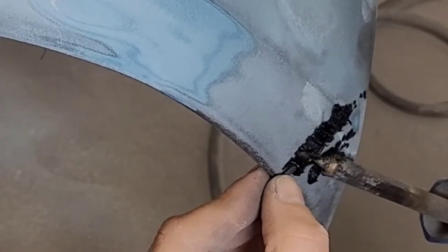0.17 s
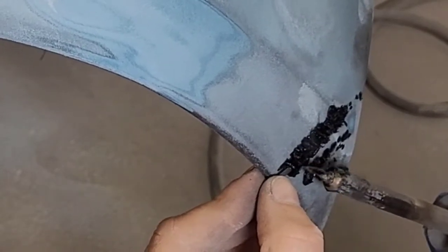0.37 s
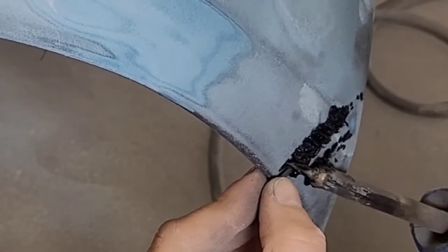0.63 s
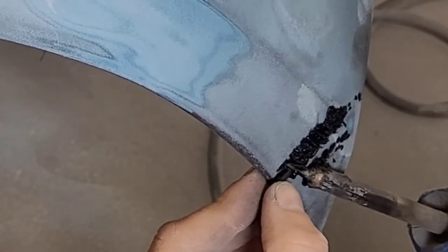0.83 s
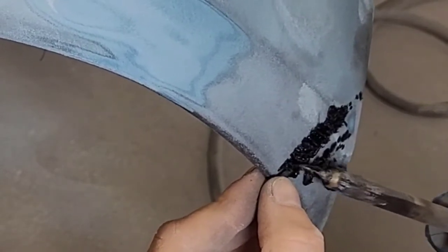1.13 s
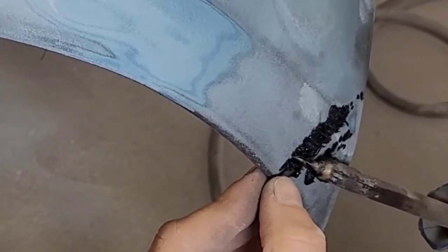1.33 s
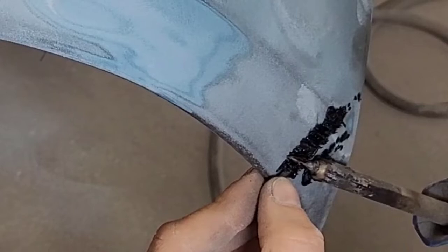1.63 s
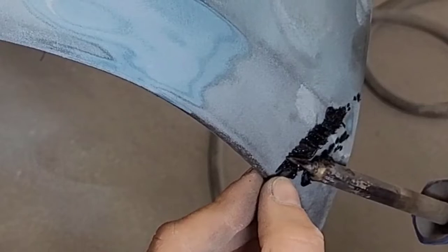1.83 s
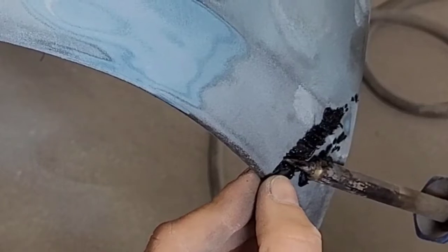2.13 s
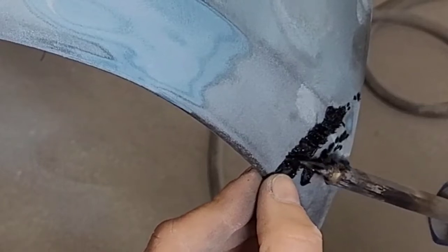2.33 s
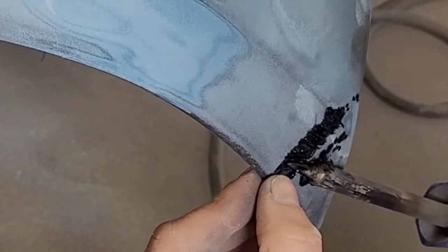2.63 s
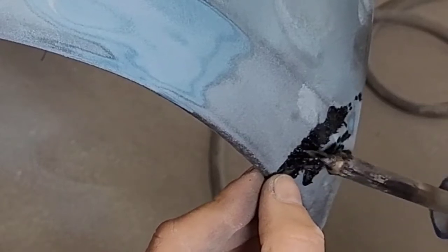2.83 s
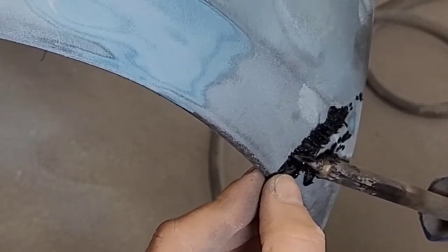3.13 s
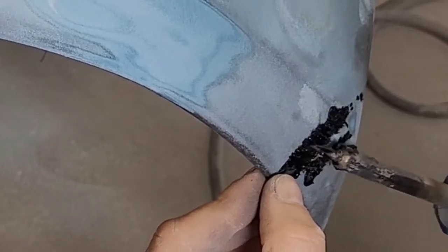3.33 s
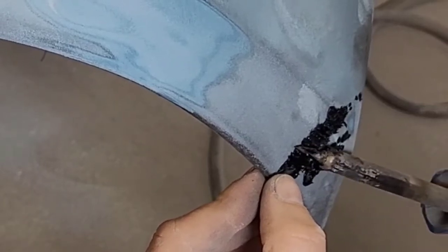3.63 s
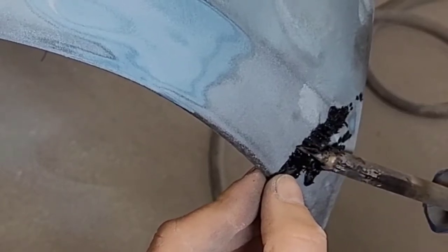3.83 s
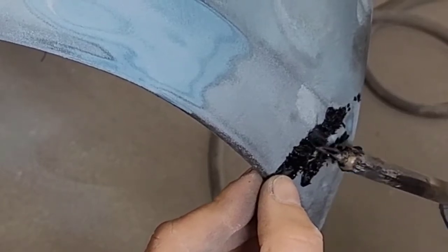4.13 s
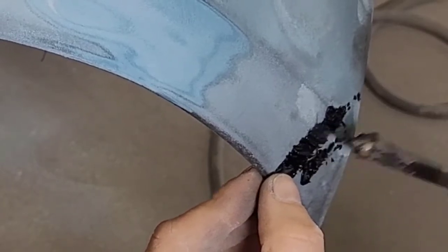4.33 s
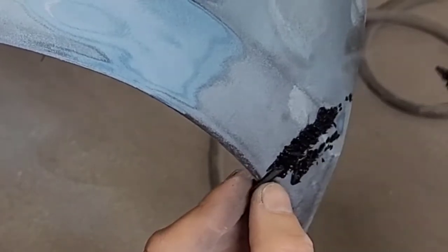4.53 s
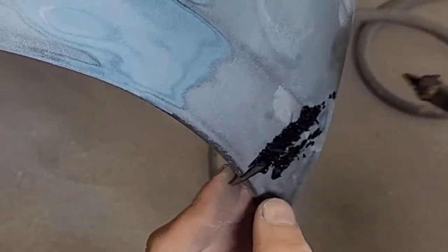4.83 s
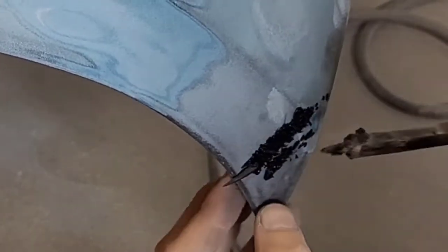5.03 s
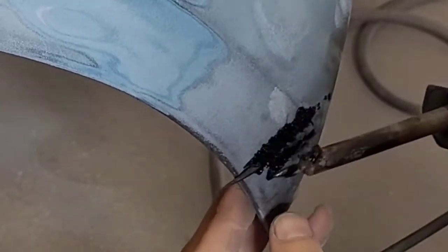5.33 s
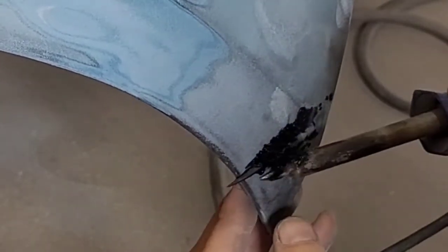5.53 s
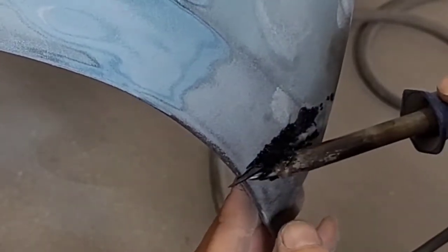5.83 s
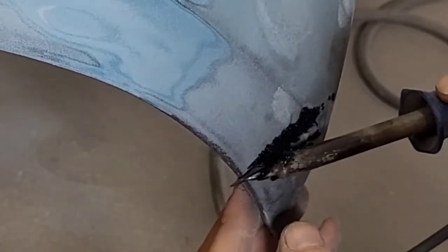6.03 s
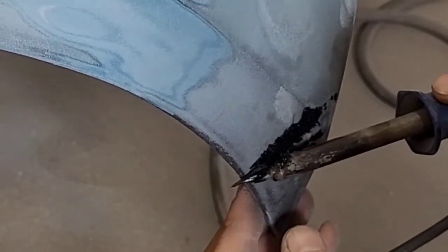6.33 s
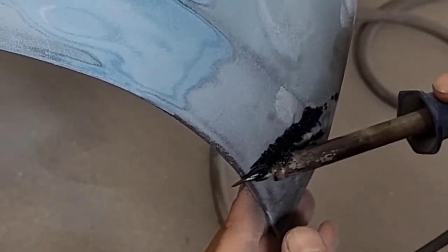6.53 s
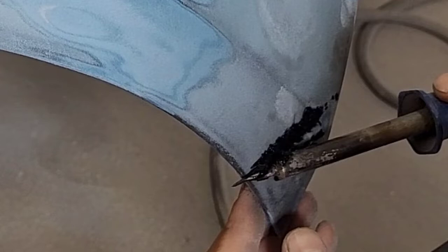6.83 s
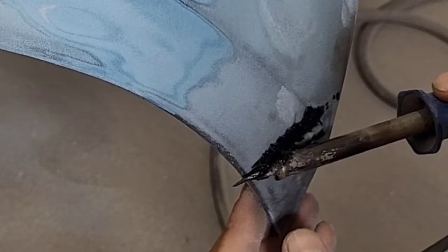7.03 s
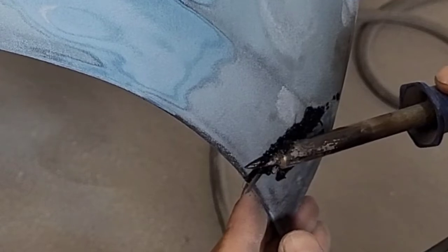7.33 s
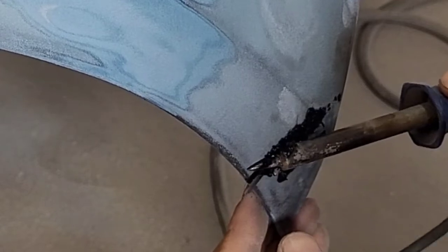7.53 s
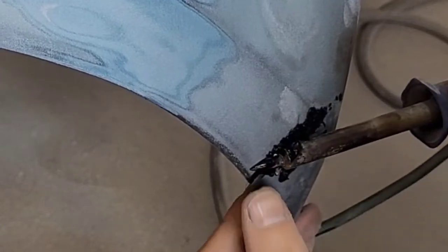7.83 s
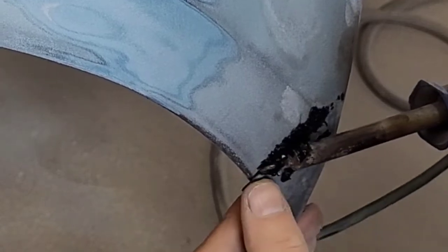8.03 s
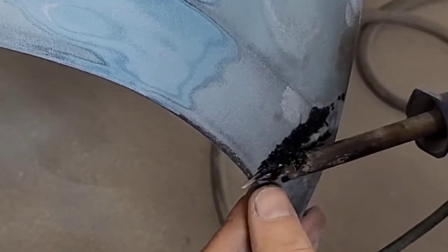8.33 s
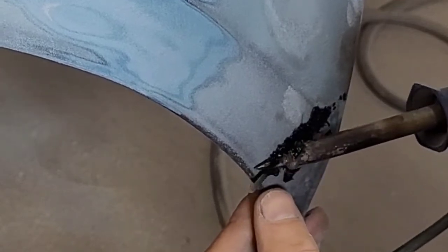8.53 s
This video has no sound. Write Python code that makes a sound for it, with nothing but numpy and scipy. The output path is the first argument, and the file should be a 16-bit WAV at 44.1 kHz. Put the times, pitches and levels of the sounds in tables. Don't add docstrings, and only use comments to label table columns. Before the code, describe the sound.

An electrical machine drones without pause in a workshop, a low, tonal buzz made of several even tones with a slow-wheel flutter. Soft air rumble lies behind it. Close by, a hot iron pressed into plastic gives very faint, grainy fizzing in short pushes, a few tiny ticks, and one clearer snap just before four seconds. Stereo pickup, close to the work, with dull highs in the background.

```python
import sys
import numpy as np
from scipy import signal
from scipy.fft import rfft, irfft, next_fast_len
from scipy.io import wavfile
from scipy.ndimage import uniform_filter1d, map_coordinates

SR = 44100
rng = np.random.default_rng(int(sys.argv[2]) if len(sys.argv) > 2 else 0)


def level_to_linear(level):
    exponent = np.asarray(level, float) / 20
    return 10 ** exponent


def bounce(signal):
    frames = np.transpose(np.atleast_2d(signal))
    limited = np.clip(frames, -1, 1)
    pcm = np.round(limited * 32767).astype(np.int16)
    wavfile.write(sys.argv[1], SR, pcm)


N = 382788


def unit(x):
    return x / np.sqrt(np.mean(x ** 2) + 1e-20)


def along(points, hz):
    f, v = np.transpose(sorted(points))
    return np.interp(np.log(hz + 1), np.log(f + 1), v)


def filtered(x, response):
    m = next_fast_len(N + 8192)
    hz = np.fft.rfftfreq(m, 1 / SR)
    return irfft(rfft(x, m) * response(hz), m)[..., :N]


def wobble(rate_hz):
    knots = rng.standard_normal(int(N * rate_hz / SR) + 4)
    return map_coordinates(knots, [np.arange(N) * rate_hz / SR])


def ports(lean_db):
    left = level_to_linear(lean_db)
    return np.array([left, np.ones_like(left)]) * np.sqrt(2 / (1 + left ** 2))


# f/Hz, left-right/dB
PORT_LEAN = [(30, -6), (62, -4), (95, 2.5), (140, -0.5), (4200, 0.5), (6400, -5.5), (7400, -2), (8300, 12),
             (11300, 8), (12000, 12.5), (15000, 4)]


def port_gains(hz):
    return ports(along(PORT_LEAN, hz))


# mains multiple, rms level/dB, left-right/dB, left lead/rad
CORE_BUZZ = [(1, -49.7, -3.1, 0.3), (2, -47.3, 2.1, 0.6), (3, -57.4, -7.3, 0.2), (4, -29.8, -0.7, 0.2),
             (5, -28.4, 0.8, -0.1), (6, -38.5, -0.5, 0.7), (7, -47.1, -2.6, -0.5), (8, -48.5, 1.3, 0.7),
             (9, -51.1, 0.8, -1.2), (10, -49.7, 2.2, 0.4), (11, -47.3, -5.8, 0.7), (12, -62.4, -1.3, -1.3),
             (14, -59.2, -0.4, 0.7), (15, -47.8, 10.5, -1.7), (16, -61.3, -3.8, -1.2),
             (17, -67.6, -1.7, -1.5), (18, -68.3, 8.9, 0.6), (20, -65.3, -4.7, 2.2), (22, -63.5, 0.8, 2.7),
             (24, -57.5, -2.8, 1.8), (25, -68.1, -10.5, -2.1), (26, -67.6, 9.9, -1.1),
             (50, -81.2, -1.1, 0.0)]
# mains multiple, wheel multiple, rms level/dB, left-right/dB,
# left lead/rad
SIDE_TONES = [(2, -2, -60.7, 1.5, 0.3), (2, -1, -58.4, -1.2, 0.2), (2, 1, -46.4, 7.3, -0.2),
              (2, 2, -49.8, -0.1, -0.2), (3, -1, -47.8, -0.3, 0.2), (3, 1, -46.2, 1.1, -0.2),
              (4, -1, -42.4, -0.3, 0.2), (4, 1, -45.5, 2.0, 0.0), (5, 1, -42.8, -0.4, -0.1),
              (6, -1, -44.8, -0.4, 0.2), (6, 1, -57.4, -9.2, 0.2), (7, -1, -51.8, -7.7, 0.2),
              (8, -1, -55.2, -4.3, 0.5), (8, 1, -56.5, -3.2, 0.8), (9, -1, -50.9, -2.6, 0.0),
              (9, 2, -58.5, -2.6, 0.3), (10, -1, -58.0, 3.4, -0.0), (11, -1, -57.0, -14.5, 0.7),
              (11, 1, -53.2, -2.0, 2.1), (15, 1, -61.7, -2.2, -0.7), (24, -1, -70.9, -6.1, -3.1),
              (26, -1, -72.2, 4.3, -0.1), (26, 1, -73.5, 9.0, -1.1), (40, -2, -75.6, 4.9, 2.5),
              (0, 5, -40.0, -2.7, 0.4), (2, -7, -49.5, -3.2, 0.3), (2, -5, -50.6, -3.0, 0.5),
               (3, -5, -62.4, -0.8, 0.2), (2, 5, -47.0, -1.7, 0.1), (2, 6, -54.6, -2.3, 0.2),
               (4, -7, -49.6, -1.6, 0.1), (4, -5, -45.9, -1.4, 0.2), (2, 11, -49.4, 1.3, 0.1),
               (3, 5, -51.1, -0.7, 0.1), (5, -5, -53.3, 1.3, -0.0), (6, -7, -52.0, 2.0, 0.0),
               (4, 7, -47.7, 1.6, -0.3), (5, 5, -55.9, 0.1, 0.1), (7, -7, -55.5, -2.8, 0.3),
               (6, 5, -57.7, -9.7, 0.7), (26, -4, -69.8, 10.2, -1.9), (26, 3, -72.0, 3.4, 1.2),
               (26, 5, -71.3, 14.5, 0.1), (26, 6, -70.4, -3.3, -2.7), (40, -3, -75.3, 1.8, -0.7),
               (42, -5, -78.2, -10.4, 0.6),
              (1, -1, -59, -2.9, .4), (1, 1, -56.3, -1.8, .4), (1, 2, -59, -3.6, .6),
              (2, -6, -61.2, -3.1, .3), (3, -13, -61.2, -2.7, .4)]


def machine():
    mains_hz, wheel_hz, unsteady_db = 49.966, 7.565, 0.84
    t = np.arange(N) / SR
    out = np.zeros((2, N))
    core = [(mains, 0, *rest) for mains, *rest in CORE_BUZZ]
    for mains, wheel, db, lean_db, lead_rad in core + SIDE_TONES:
        tone_hz = mains * mains_hz + wheel * wheel_hz
        phase = 2 * np.pi * (tone_hz * t + rng.random())
        pair = np.sin(phase + np.array([[lead_rad], [-lead_rad]]) / 2)
        out += np.sqrt(2) * level_to_linear(db) * ports(lean_db)[:, None] * pair
    return out * level_to_linear(unsteady_db * wobble(0.58))


# t/s, level/dB
SIMMER_HEAT = [
    (0, -70.5),
    (.9, -71.5),
    (2.2, -70),
    (3.3, -70),
    (4.7, -68.5),
    (5.8, -70),
    (7.2, -70.5),
    (8.68, -72),
]
# t/s, hold/s, level/dB
TIP_PUSHES = [(0.089, .05, -68), (0.193, .06, -69.5), (0.319, .02, -67), (0.492, .06, -66.5),
              (1.019, .04, -66), (1.172, .02, -68.5), (1.383, .08, -69.5), (2.861, .06, -69),
              (3.134, .03, -66.5), (3.397, .04, -67.5), (3.796, .02, -63.5), (3.921, 0.065, -64.5),
              (4.12, .12, -67), (4.40, .02, -68.5), (4.892, .03, -64), (5.08, .03, -64.5),
              (5.378, .04, -70), (5.631, .1, -66), (5.912, .03, -68.5), (6.328, .02, -69),
              (6.414, .06, -67.5), (7.756, .02, -68), (7.94, .1, -69.5), (8.339, .03, -64.5),
              (8.451, .04, -66)]


def pressure():
    attack_s, release_s = 0.015, 0.045
    t = np.arange(N) / SR
    power = level_to_linear(np.interp(t, *np.transpose(SIMMER_HEAT))) ** 2
    for start_s, hold_s, db in TIP_PUSHES:
        rise = np.clip((t - start_s) / attack_s + 1, 0, 1)
        fall = np.exp(-np.clip(t - start_s - hold_s, 0, None) / release_s)
        power = power + (level_to_linear(db) * rise * fall) ** 2
    return np.sqrt(power)


# f/Hz, level/dB per Hz
FIZZ_COLOUR = [(1500, -24), (3000, -6.5), (6000, 5.5), (8500, -2), (12000, -3.5), (15500, -7.5),
               (20000, -7.5)]


def sizzle():
    grainy_db = 3
    grains = level_to_linear(grainy_db * wobble(400)) * rng.standard_normal((2, N))
    fizz = filtered(grains, lambda hz: level_to_linear(along(FIZZ_COLOUR, hz)) * port_gains(hz))
    return pressure() * unit(fizz)


# t/s, peak level/dB, left-right/dB
BURSTS = [
    (.1974, -59, 3),
    (.4903, -60, 6),
    (3.7609, -56, 3),
    (3.7868, -43.5, 5),
    (4.1325, -58, 7.5),
    (4.9062, -60, 4.5),
    (5.6236, -63, 6),
    (8.3499, -60.5, 6.5),
]
# f/Hz, level/dB per Hz
SNAP_COLOUR = [(2000, -30.5), (4500, -15), (7000, -2.5), (9000, -2), (13000, -1.5), (15000, -3),
               (16500, -10), (20000, -20)]


def ticks():
    tail_s, tail_db = 0.28, -31
    echo_s, echo_db = 0.0076, -11
    t = np.arange(SR // 2) / SR
    snaps = np.zeros((2, N + SR))
    for burst_s, db, pan_db in BURSTS:
        tick = level_to_linear(tail_db - 60 * t / tail_s) * rng.standard_normal((2, len(t)))
        tick[:, [0, round(echo_s * SR)]] = 1, level_to_linear(echo_db)
        start = round((burst_s + 0.0015) * SR)
        gains = level_to_linear(db + 20) * ports(pan_db - 6)
        snaps[:, start:start + len(t)] += gains[:, None] * tick
    return filtered(snaps[:, :N], lambda hz: level_to_linear(along(SNAP_COLOUR, hz)) * port_gains(hz))


def iron():
    return sizzle() + ticks()


# f/Hz, width/Hz, depth/dB
ROOM_NULLS = [(177, 6, 8), (279, 8, 6), (312, 6.3, 5), (368, 8, 2), (416, 8, 6.5), (460, 6, 6), (485, 8, 3),
              (525, 15, 6), (585, 8, 3), (635, 6, 2), (660, 15, 3)]


def null_depth_db(hz):
    return sum(depth_db * np.exp(-((hz - f) / width_hz) ** 2) for f, width_hz, depth_db in ROOM_NULLS)


# f/Hz, level/dB per Hz
NOISE_MID = [(22, -77.5), (32, -67), (41, -65), (48, -60.5), (56, -56.5), (66, -61.5), (76, -70),
             (100, -72.5), (118, -70), (126, -62), (150, -63), (166, -56.5), (200, -63), (235, -61),
             (235, -60.5), (262, -61), (300, -65.5), (318, -59.5), (345, -66), (380, -64.5), (440, -60.5),
            (500, -62), (560, -64.5), (620, -72.5), (650, -69), (720, -72), (790, -71.5), (850, -78.5),
             (850, -78.5), (930, -77), (1050, -80.5), (1300, -82), (1500, -86), (2000, -86.5), (3000, -92.5),
            (4500, -98.5), (6500, -104.5), (7800, -112), (10000, -116), (13000, -118), (15400, -120)]
# f/Hz, level/dB per Hz
NOISE_OPPOSED = [(22, -95), (57, -80.5), (100, -81), (120, -85), (166, -76),
                 (235, -77.5), (262, -76), (300, -72.5), (318, -71.5), (345, -73), (380, -73.5), (440, -68),
                (500, -71.5), (560, -67), (620, -78), (650, -76.5), (720, -68), (790, -75.5), (850, -83),
                 (850, -74.5), (930, -79.5), (1050, -77.5), (1300, -80), (1500, -83), (2000, -87),
                (3000, -92.5), (4500, -98.5), (6500, -104), (7800, -112), (10000, -116), (13000, -117.5),
                (15400, -120)]
# f/Hz, left lead/rad
PORT_LEAD = [(30, .4), (62, .4), (120, 0.21), (400, 0.39), (800, 0)]


def air():
    patchy_db = 0.28
    z = signal.stft(rng.standard_normal((2, N)), nperseg=512)[2]
    patches = uniform_filter1d(rng.standard_normal(z.shape[1:]), size=8, axis=0)
    patches = unit(uniform_filter1d(patches, size=14, axis=1))
    pair = signal.istft(z * level_to_linear(patchy_db * patches), nperseg=512)[1][:, :N]
    spectra = [NOISE_MID, NOISE_OPPOSED]

    def room(hz):
        level_db = [along(spectrum, hz) - null_depth_db(hz) for spectrum in spectra]
        return np.sqrt(SR / 2) * level_to_linear(level_db) * (hz > 12)

    def mismatch(hz):
        return port_gains(hz) * np.exp(0.5j * np.outer([1, -1], along(PORT_LEAD, hz)))

    mid, side = filtered(pair, room)
    return filtered(np.array([mid + side, mid - side]), mismatch)


def scene():
    return machine() + iron() + air()


def top_cut(x):
    return signal.sosfilt(signal.butter(12, 15500, fs=SR, output="sos"), x)


def record(dry):
    return top_cut(dry)


dry = scene()
out = record(dry)
bounce(out)
```